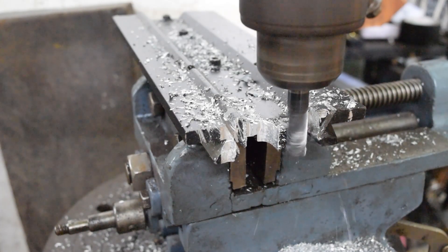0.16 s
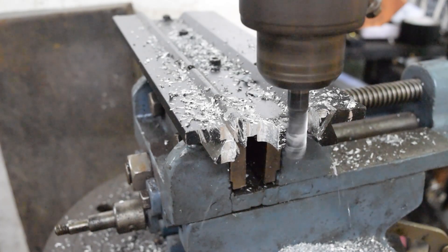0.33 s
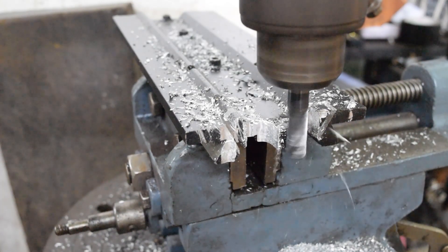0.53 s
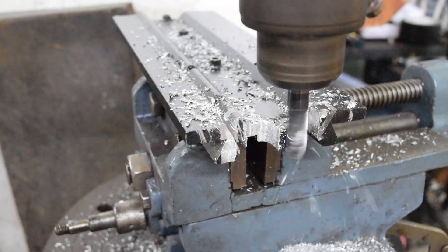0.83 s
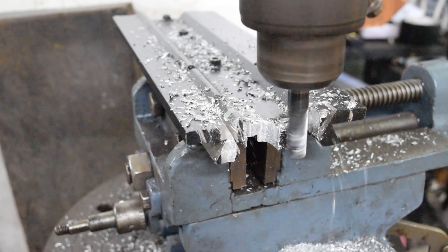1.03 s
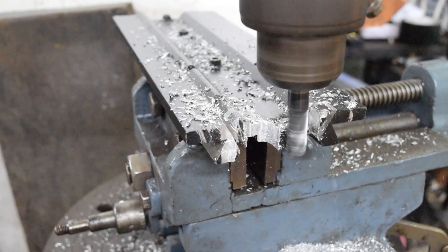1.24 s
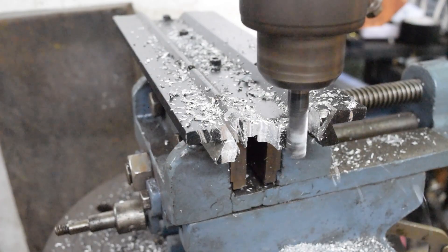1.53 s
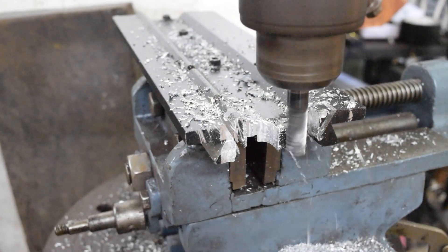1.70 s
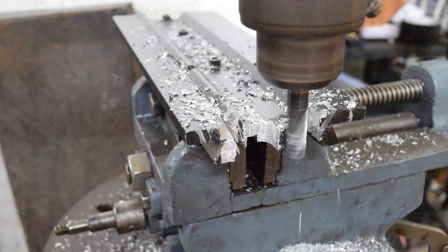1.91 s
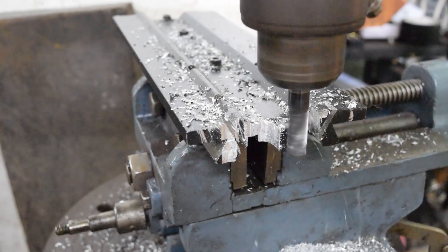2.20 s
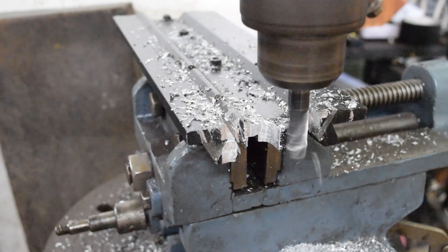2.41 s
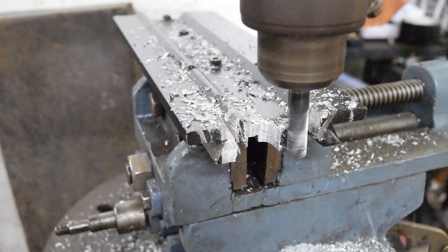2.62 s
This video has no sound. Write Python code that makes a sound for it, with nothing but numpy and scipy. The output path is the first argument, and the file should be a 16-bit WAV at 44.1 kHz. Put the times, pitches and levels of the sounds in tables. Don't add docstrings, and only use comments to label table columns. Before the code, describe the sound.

Rapid metallic chatter and gritty hiss of metal being milled, over a faint low motor hum

```python
import sys
import numpy as np
from scipy import signal
from scipy.fft import rfft, irfft
from scipy.io import wavfile
from scipy.ndimage import uniform_filter1d

SR = 44100
rng = np.random.default_rng(int(sys.argv[2]) if len(sys.argv) > 2 else 0)


def bounce(signal):
    frames = np.transpose(np.atleast_2d(signal))
    limited = np.clip(frames, -1, 1)
    pcm = np.round(limited * 32767).astype(np.int16)
    wavfile.write(sys.argv[1], SR, pcm)


def invert_db(x):
    u = np.asarray(x, float) / 20
    return 10 ** u


N = 121275
T = np.arange(N) / SR
WARM_UP = 8044

# (time [s], feed load [dB], grit [dB], lean of the plate in the vise [dB], up favours the higher ring)
HAND_FEED = [(0, -38.5, -28, -14.5), (.14, -34.5, -30, -4), (.3, -30, -30, 1.5), (.46, -39, -30, -9),
             (.65, -34.5, -31, 0), (.83, -35, -30.5, -5), (.97, -29.5, -28.5, -1), (1.12, -29.5, -28, 0.5),
             (1.22, -32.5, -30, 0.5), (1.36, -30, -29, 0), (1.52, -35, -31, 4), (1.72, -33.5, -30, -5.5),
             (1.86, -33.5, -31, 7), (2.04, -27.5, -27.5, 2.5), (2.2, -27, -25.5, 5),
             (2.36, -28.5, -26.5, -0.5), (2.55, -30.5, -29, 1), (2.75, -36, -32.5, -5)]
FEED_REST_DB, GRIT_REST_DB = -33, -31


def evened(x):
    return x / np.sqrt(np.mean(x ** 2) + 1e-20)


def smoothed(x, size, axis=-1):
    return uniform_filter1d(uniform_filter1d(x, size=size, axis=axis), size=size, axis=axis)


def drift(size):
    return evened(smoothed(rng.standard_normal(N), size))


def curve(table, col):
    rows = np.array(table, float)
    return np.interp(T, rows[:, 0], rows[:, col])


def resonate(x, hz, width):
    radius = np.exp(-np.pi * abs(width) / SR)
    poles = [1, -2 * radius * np.cos(2 * np.pi * hz / SR), radius * radius]
    return signal.lfilter([1, 0, -1], poles, np.r_[x[:WARM_UP], x])[WARM_UP:]


def steadied(x):
    steady_share = .95
    return evened(x / smoothed(x ** 2, 4000) ** (steady_share / 2))


def bites():
    # (time [s], speed [turns/s])
    spindle_speed = [(0, 21.93), (.9, 21.925), (1.5, 21.91), (2.0, 21.93), (2.75, 21.945)]
    # (place in the turn [0-1], bite at the start [dB], bite at the end [dB])
    flutes = [
        (.223, -9, -8),
        (.47, -2, 0),
        (.725, -6, -2),
        (.968, 0, -8),
    ]
    spread_db, drift_db, jitter_s = 1.4, .9, .00005
    flex_s = .00011
    turns, out = np.cumsum(curve(spindle_speed, 1)) / SR, np.zeros(N)
    luck = rng.standard_normal((70, 4, 2))
    for k, (place, first_db, last_db) in enumerate(flutes):
        at = np.interp(np.arange(70) - 2 + place, turns, T, -1, -1) + jitter_s * luck[:, k, 0]
        inside = (at > 0) & (at < T[-1])
        at = (at[inside] * SR).astype(int)
        sway = drift(size=5000)
        at = np.clip(at + (flex_s * SR * sway[::-1][at]).astype(int), 0, N - 1)
        bite_db = first_db + (last_db - first_db) * at / N
        out[at] = invert_db(bite_db + spread_db * luck[inside, k, 1] + drift_db * sway[at])
    return out


def tearing(knocks, gate):
    fade_s = .0045
    burst = signal.lfilter([1], [1, -np.exp(-1 / (fade_s * SR))], knocks)
    return 1 + gate * evened(burst)


def plate(knocks, tear):
    # (frequency [Hz], width [Hz], level [dB], share of the feed followed [dB/dB])
    body_modes = [(327, 11.3, -56.5, 0.054), (449, 18, -53.5, 0.16), (507.6, 29, -46, 0.033),
                  (627.3, 4.2, -51.5, 0.12), (687, 13.5, -40.5, 1.78), (785.1, 13.4, -41.5, 1.71),
                  (881.3, 56, -40, 1.2), (1046, 37, -47, 0.52), (1444, 44, -52, 2), (1750, 175, -56, 2.26),
                  (2028, 143, -38, 0.92), (2290, 370, -41.5, 0.59), (2527, 73, -41, 0.23),
                  (2730, 87, -42.5, 0.62)]
    scrape_share, scrape_tilt = .5, 1.4
    scrape = scrape_share * evened(tear * rng.standard_normal(N))
    load_db = curve(HAND_FEED, 1) - FEED_REST_DB
    grit_db = curve(HAND_FEED, 2) - GRIT_REST_DB
    lean_db, out = curve(HAND_FEED, 3), 0
    for k, (hz, width, db, share) in enumerate(body_modes):
        drive = evened(knocks) + scrape * max(hz / 760, 1) ** scrape_tilt
        feed_db = load_db if hz < 1200 else 1.5 * grit_db
        drift_db = 1.3 if hz < 640 else .4
        level_db = db + share * feed_db + drift_db * drift(size=4000)
        level_db += lean_db * ((740 < hz < 830) - (640 < hz < 740))
        ring = steadied(resonate(resonate(drive, hz, width), hz, 4 * width))
        out = out + (-1) ** k * invert_db(level_db) * ring
    return out


def grit(knocks):
    # (frequency [Hz], density [dB per Hz])
    torn_metal = [(71, -70), (120, -33), (231, -13.5), (295, -20), (789, -4), (1090, -4), (2480, -4.5),
                  (7980, -12), (16000, -29.5)]
    # (frequency [Hz], width [Hz], level [dB])
    cutter_modes = [(3450, 164, 11.5), (3710, 154, 9), (4380, 440, 6), (4880, 750, -5.5), (5200, 690, 4),
                    (5706, 580, 4), (5990, 520, -9.5), (6570, 340, 3), (7400, 106, -7), (8160, 580, 0.5),
                    (9030, 660, 2), (10000, 1050, -7.5), (11500, 680, -26.5), (15000, 430, -32)]
    hiss_db, cutter_db, flicker_db = -29.5, -43, 1.52
    split_hz, low_follow, high_follow = 4000, .89, .42
    low_gate, high_gate = .36, .25
    frames = N // 64 + 5
    a, b = rng.standard_normal((2, 129, frames))
    flicker = uniform_filter1d(rng.standard_normal((129, frames)), size=30, axis=0)
    flicker = evened(uniform_filter1d(flicker, size=6, axis=1))
    raw = signal.istft((a + 1j * b) * invert_db(flicker_db * flicker), nperseg=256, noverlap=192)[1][:N]
    hz, load_db = np.fft.rfftfreq(N, 1 / SR), curve(HAND_FEED, 2) - GRIT_REST_DB
    low = irfft(rfft(raw) / (1 + (hz / split_hz) ** 4), N)
    high = raw - low
    low = low * tearing(knocks, low_gate) * invert_db(low_follow * load_db)
    high = high * tearing(knocks, high_gate) * invert_db(high_follow * load_db)
    raw = low + high
    f, db = np.transpose(torn_metal)
    colour = invert_db(np.interp(np.log(hz + 1), np.log(f), db))
    hiss = evened(irfft(rfft(raw) * colour, N))
    ring = 0
    for mode_hz, width, mode_db in cutter_modes:
        mode = evened(resonate(resonate(raw, mode_hz, width), mode_hz, 2 * width))
        ring = ring + invert_db(mode_db) * np.sqrt(width) * mode
    return invert_db(hiss_db) * hiss + invert_db(cutter_db) * evened(ring)


def chips():
    chips_per_s, spread_db, level_db = 900, 3.6, -49
    size = invert_db(spread_db * np.minimum(rng.exponential(1, N), 5)) * (rng.random(N) < chips_per_s / SR)
    kind, t, out = rng.integers(0, 16, N), np.arange(300) / SR, np.zeros(N)
    for k, hz in enumerate(np.geomspace(3200, 15000, num=16)):
        ring = np.sin(2 * np.pi * hz * t) * np.exp(-t * hz / 6) * (4000 / hz) ** 0.19
        out += signal.oaconvolve(size * (kind == k), ring)[:N]
    return invert_db(level_db) * evened(out)


def motor():
    # (frequency [Hz], level [dB], start of the cycle [0-1], waver [dB])
    hum_tones = [
        (240.0, -46.5, .51, .4),
        (263.4, -50, .55, 2.2),
    ]
    wander_turns, out = .05, 0
    for k, (hz, db, turn, waver_db) in enumerate(hum_tones):
        level = invert_db(db + waver_db * drift(size=5000)) * np.sqrt(2)
        cycles = hz * T + turn + k * wander_turns * drift(size=3000)
        out = out + level * np.sin(2 * np.pi * cycles)
    return out


def pings(rows, t60, lift_db):
    out, t = np.zeros(N + 2000), np.arange(2000) / SR
    for s, db, hz in rows:
        rings = sum(np.sin(2 * np.pi * hz * (1 + step) * t) for step in rng.uniform(-0.053, 0.017, 4))
        onset = np.minimum(t * hz / 4, 1)
        out[round(s * SR):][:2000] += invert_db(db + lift_db - 60 * t / t60) * onset * rings / 3
    return out[:N]


def clangs():
    # (time [s], peak level [dB], frequency [Hz])
    hard_bites = [(0.0283, -24, 2050), (0.0443, -28, 2070), (0.0912, -18, 2080), (0.1146, -21, 2080),
                  (0.163, -16, 2050), (0.1815, -37, 2220), (0.2034, -13, 2100), (0.2533, -9, 1990),
                  (0.2887, -12, 2140), (0.3446, -25, 2050), (0.3905, -15, 2080), (0.4898, -23, 2040),
                  (0.6779, -24, 2300), (0.7233, -47, 2130), (0.8649, -28, 2200), (0.935, -17, 2030),
                  (0.9812, -8.5, 2130), (1.0263, -14, 2080), (1.0485, -22, 2290), (1.1124, -16, 2000),
                  (1.1588, -12, 2100), (1.2027, -18, 2060), (1.2965, -12, 2100), (1.3169, -12, 2120),
                  (1.3418, -10, 2070), (1.385, -24, 2050), (1.4311, -20, 2170), (1.5698, -17, 2070),
                  (1.7065, -26, 2040), (1.8452, -23, 2030), (1.8906, -11, 1980), (1.936, -8, 2040),
                  (1.9824, -14, 1900), (2.0273, -8, 2030), (2.0682, -8, 2120), (2.0896, -15, 2030),
                  (2.1306, -21, 1990), (2.1565, -34, 1860), (2.2111, -15, 2060), (2.2253, -4.5, 2060),
                  (2.2573, -13, 2070), (2.3361, -11, 2000), (2.3585, -14, 1760), (2.3885, -14, 2110),
                  (2.4325, -9, 2090), (2.4957, -15, 2050), (2.5404, -13, 2000), (2.5895, -20, 1990)]
    return pings(hard_bites, t60=.025, lift_db=-6)


def snaps():
    # (time [s], peak level [dB], frequency [Hz])
    chip_breaks = [(0.0578, -15, 5200), (0.0907, -12.5, 3530), (0.1361, -12.5, 3360), (0.181, -15, 3480),
                   (0.2798, -34, 3500), (0.4499, -32, 3630), (0.5453, -13.5, 3600), (0.6814, -15, 3400),
                   (0.951, -17, 3620), (1.0682, -14, 3800), (1.295, -20, 3450), (1.3404, -17, 3500),
                   (1.382, -17, 3500), (1.5848, -19, 3500), (2.042, -17, 3520), (2.087, -11.5, 3430),
                   (2.167, -15, 3440), (2.2109, -13, 3450), (2.306, -23, 3600), (2.3361, -18, 5200),
                   (2.4324, -21, 3580), (2.5206, -16.5, 5100)]
    return pings(chip_breaks, t60=.011, lift_db=-3)


def rubs():
    # (time [s], peak level [dB], frequency [Hz])
    edge_contacts = [(0.1346, -49, 7340), (0.517, -22, 7700), (0.6075, -26, 7900), (0.9717, -24, 7800),
                     (1.0186, -31, 7900), (1.0495, -27, 7800), (1.2805, -32, 8000), (1.4576, -22.5, 8160),
                     (1.6008, -23.5, 8100), (1.6921, -24, 8100), (1.7374, -30, 8040), (1.783, -23, 8000),
                     (1.8287, -24, 7800), (1.874, -27, 8000), (1.9337, -25, 8100), (2.1655, -32, 8000),
                     (2.2109, -28, 8000), (2.4204, -23, 7700), (2.4733, -24, 8100), (2.6454, -24, 7850),
                     (2.6908, -25, 8440), (2.7367, -21, 7800)]
    return pings(edge_contacts, t60=.012, lift_db=1)


def room(x):
    t60_s = .3
    at = np.arange(200, 16000, 20) + rng.integers(0, 20, 790)
    taps = np.zeros(16100)
    taps[at] = rng.choice([-1., 1.], len(at)) * invert_db(-60 * at / SR / t60_s)
    return signal.fftconvolve(np.r_[x[:WARM_UP], x], taps / np.linalg.norm(taps))[WARM_UP:][:N]


def scene():
    room_db = -15
    knocks = bites()
    body = plate(knocks, tearing(knocks, gate=.36))
    bright = grit(knocks) + chips() + clangs() + snaps() + rubs()
    return (body + bright + invert_db(room_db) * room(bright) + motor())[None]


def low_pass(x):
    return signal.sosfilt(signal.butter(12, 15730, fs=SR, output="sos"), x)


def record(dry):
    low_cut_hz, self_noise_db = 128, -76
    high_pass = signal.butter(4, low_cut_hz, "high", fs=SR, output="sos")
    thin = signal.sosfilt(high_pass, np.c_[dry[:, :WARM_UP], dry])[:, WARM_UP:]
    thin = thin + invert_db(self_noise_db) * rng.standard_normal(dry.shape)
    return low_pass(thin)


dry = scene()
out = record(dry)
bounce(out)
```